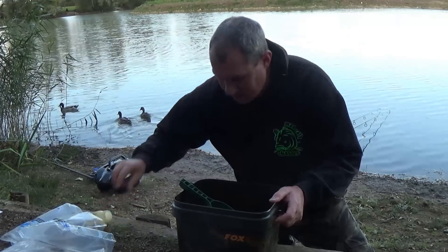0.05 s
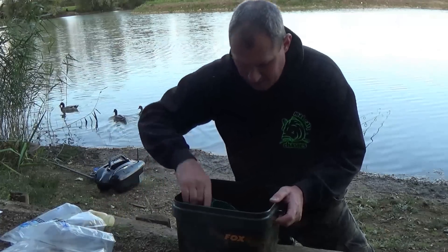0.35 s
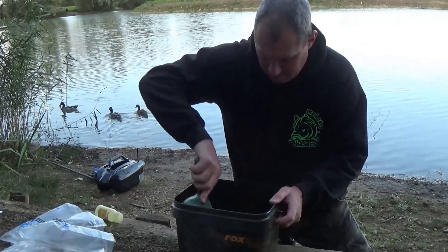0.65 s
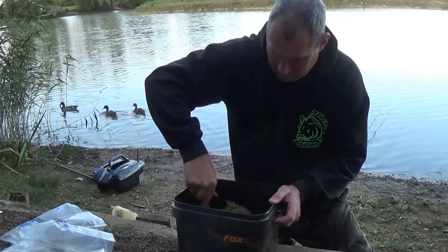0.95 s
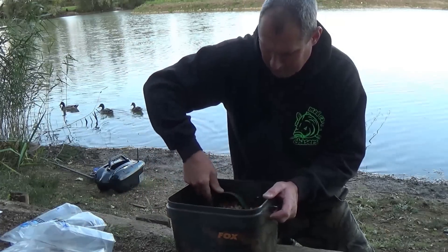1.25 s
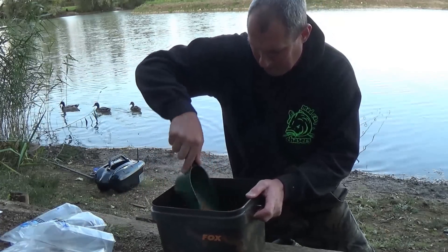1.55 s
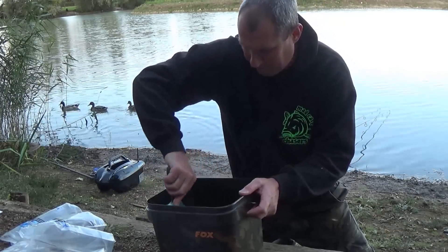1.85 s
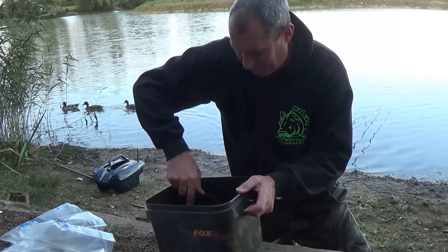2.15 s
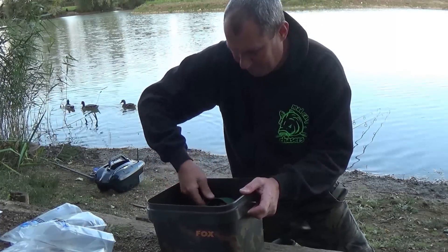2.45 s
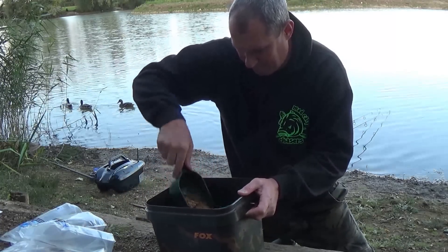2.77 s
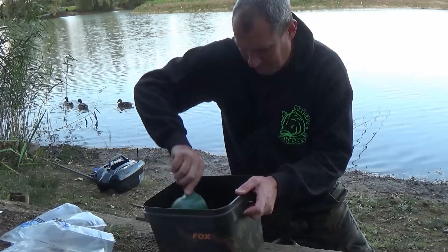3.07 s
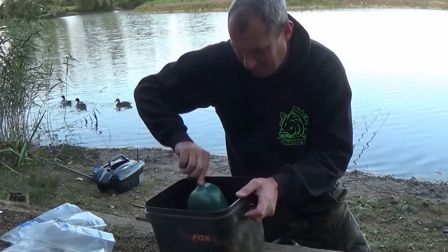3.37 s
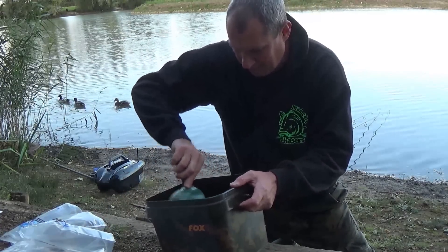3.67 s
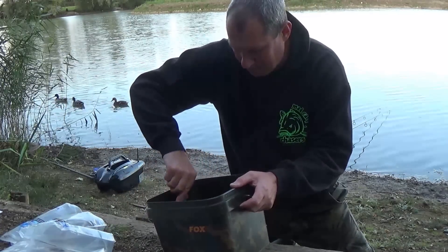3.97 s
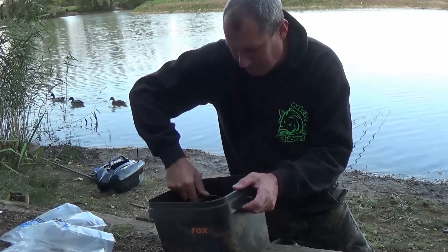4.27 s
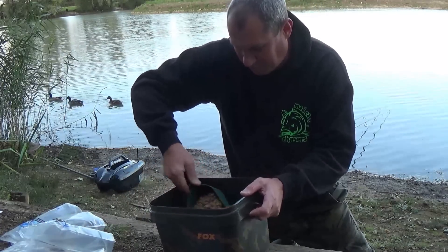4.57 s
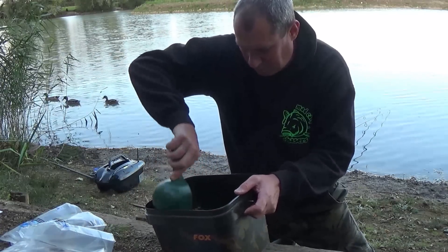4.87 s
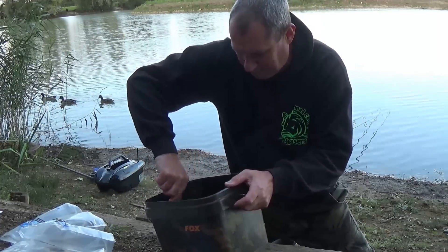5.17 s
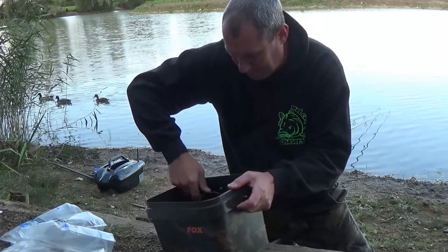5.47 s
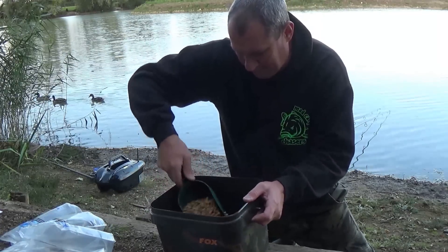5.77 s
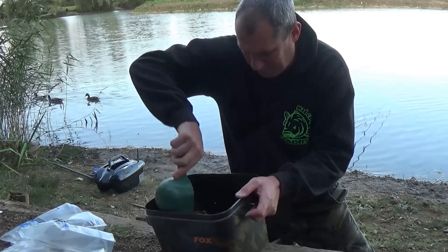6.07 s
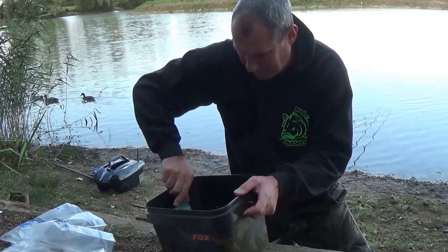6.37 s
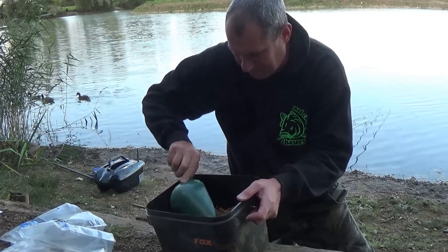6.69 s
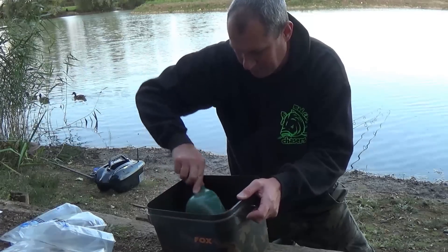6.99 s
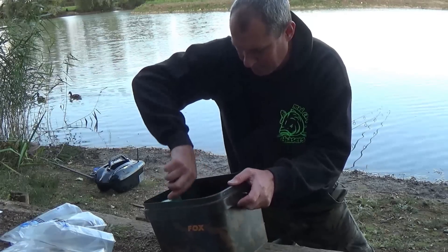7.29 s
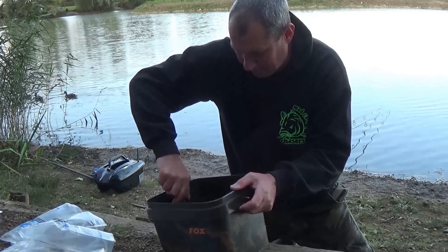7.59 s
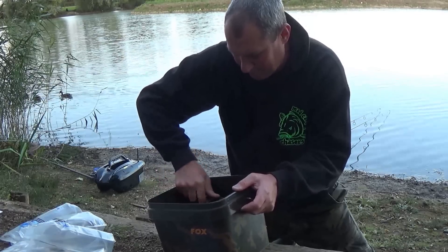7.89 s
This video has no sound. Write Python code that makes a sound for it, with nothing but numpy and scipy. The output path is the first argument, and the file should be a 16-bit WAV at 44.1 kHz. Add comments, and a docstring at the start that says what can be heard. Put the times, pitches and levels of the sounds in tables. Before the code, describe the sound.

At the very start a sleeve swishes softly and a small bottle is put down with a light knock. A few clicks follow, and at about 0.6 seconds a plastic scoop digs into damp pellets in a plastic bucket. It grinds through the heap and lifts, and the pellets rattle and spill back as many tiny, bright impacts. At about 1.3 seconds the bottle topples with a short hollow knock. The mixing carries on almost without a break, with fresh strokes near 1.7, 3, 3.7, 4.9, 6.1, 6.8 and 7.2 seconds, the last running to the end at about 8 seconds. Sharp clacks dot the rattling, and the scoop sometimes rubs the wall or bumps it with a dull thud, notably around 1.7, 3.7 and 7.2 seconds. The bucket is close and nearly straight ahead, over the faint, even hiss of a quiet lake shore.

```python
"""Scooping bait pellets in a bucket

A plastic scoop turns damp pellets in a plastic bucket on a quiet, faintly hissing lake shore.
It digs in, grinds through the heap and lifts; pellets rattle, clack and spill back as many tiny impacts.
Now and then it bumps the bucket, whose modes ring as a dull thud. At the start a sleeve swishes past
and a small bottle is put down; it topples a little later with a hollow knock."""
import sys
import numpy as np
from scipy import signal
from scipy.fft import rfft, irfft, next_fast_len
from scipy.io import wavfile

SR = 44100
rng = np.random.default_rng(int(sys.argv[2]) if len(sys.argv) > 2 else 0)


def file_out(sig):
    """Save sig as 16-bit WAV at sys.argv[1]."""
    # one column per channel
    cols = np.atleast_2d(sig).T
    # limit, then scale
    lim = np.clip(cols, -1, 1)
    pcm = np.round(lim * 32767).astype(np.int16)
    wavfile.write(sys.argv[1], SR, pcm)


N = 354652
TIME = np.arange(N) / SR

# Table levels are relative; each source applies its own gain.
# spectra: f/Hz, level/dB
SHORE_SPECTRUM = [(30, -39), (100, 0), (200, -10), (400, -4.5), (700, 6.5), (1000, 8), (1400, 1),
                  (3000, -2.5), (6000, -5.5), (10000, -43), (15000, -18)]
SLEEVE_SPECTRUM = [(500, -3), (1800, -4), (4000, -7), (6200, -2), (7500, -4), (9500, -4), (15000, -24)]
BOOM_SPECTRUM = [(30, -82), (95, -62), (140, -12.5), (220, -5), (330, 2), (450, -3.5), (600, -8.5),
                 (750, 0), (1100, -28)]
CLACK_SPECTRUM = [(200, -70), (700, -5.5), (1800, 2.5), (4000, 8.5), (6000, 9.5), (8500, 5), (11000, -1.5),
                  (15500, -20)]
GRIND_SPECTRUM = [(300, -28.5), (520, -11.5), (720, 0), (1100, 1.5), (1700, 0.5), (2400, 4.5), (3300, 1),
                  (6000, -35.5)]
RATTLE_SPECTRUM = [(500, -59), (1100, -0.5), (1800, -8.5), (2600, -1), (4000, 5.5), (5600, 3.5),
                   (7000, -1.5), (9000, -7), (15000, -37)]
SPILL_SPECTRUM = [(3000, -53), (5500, -1), (7000, -1), (8400, 0.5), (9700, -3), (11000, -8.5),
                  (12500, -14.5), (15500, -31)]
# stereo side weighting: f/Hz, level/dB
SIDE_SPECTRUM = [(60, -31), (150, -29), (400, -19), (800, -15.5), (1250, -20.5), (1800, -37), (3200, -16.5),
                 (6500, -23.5), (9000, -24.5), (13000, -7.5)]
# sleeve sweeping past: t/s, level/dB, reflection lag/ms
SLEEVE_SWEEP = [(0, -61, 0.49), (0.06, -44, 0.79), (0.15, -55, 0.76), (0.28, -57.5, 0.76), (0.37, -61, .92),
                (0.45, -94, 0.86)]
# bottle knocks: t/s, level/dB, f/Hz, t60/s
BOTTLE_KNOCKS = [(0.0643, -16, 530, 0.06), (0.074, -31, 474, .08), (0.083, -34, 496, 0.088),
                 (0.093, -38, 480, .07), (1.348, -14, 580, 0.24)]
# bottle modes: f/knock f, level/dB, t60/knock t60
BOTTLE_MODES = [(1, -6.5, 0.49), (1.17, -26, 0.65), (1.5, -6.5, 0.14), (2.2, -19, 0.44), (3.65, -21, 0.82),
                (6.1, -16, .15)]
# scoop hits bucket: t/s, level/dB, contact cutoff/Hz
BUCKET_BUMPS = [(0.558, -43, 900), (0.611, -39, 900), (0.664, -17.5, 450), (1.095, -22, 900),
                (1.14, -17.5, 256), (1.524, -27, 900), (1.706, -14.5, 350), (2.367, -17, 300),
                (3.009, -20.5, 463), (3.049, -19, 204), (3.748, -17, 600), (3.767, -23, 600),
                (4.328, -18, 400), (4.855, -24, 600), (5.49, -19.5, 300), (6.073, -21, 610),
                (6.094, -23, 610), (6.129, -21, 600), (6.806, -22.5, 2370), (6.819, -23, 900),
                (7.224, -14.5, 800), (7.267, -22.5, 900), (7.886, -17, 900)]
# modes of the loaded bucket: f/Hz, level/dB, t60/s
BUCKET_MODES = [(131, -19, 0.063), (177, -9, 0.048), (243, -2, 0.032), (304, 0, 0.045), (415, 3, 0.031),
                (522, -11.5, 0.071), (800, 4, 0.01), (1420, 19.5, 0.0017), (1800, 7, 0.016),
                (2690, -5, 0.013)]
# air and wall resonances excited by pellets: f/Hz, bandwidth/Hz, gain/dB
BUCKET_RESONANCES = [(407, 92, 11), (545, 30, 6.5), (720, 260, 6.5), (850, 130, 1.5), (1060, 240, 1.5),
                     (1446, 130, 2.5), (1810, 300, 3.5), (2690, 220, 2.5)]
# scoop-to-wall paths: lag/gap cycles, gain
WALL_PATHS = [(2.4, 0.13), (3.9, 0.23), (6.3, 0.19)]
# gap behind the scoop, lower when pushed in, higher on the lift: t/s, f/Hz
GAP_PITCH = [(0.65, 1636), (1.05, 1407), (1.25, 1245), (1.5, 1650), (1.74, 1770), (2.15, 1212), (2.31, 850),
             (2.45, 1283), (2.92, 1890), (3.08, 2000), (3.2, 1285), (3.5, 1590), (3.76, 2015), (3.88, 1475),
             (4.13, 1213), (4.26, 908), (4.42, 1193), (4.7, 1660), (4.88, 2040), (5.01, 1440), (5.17, 1476),
             (5.33, 964), (5.55, 1564), (5.8, 1740), (6.04, 1950), (6.3, 1430), (6.48, 1184), (6.7, 1730),
             (6.95, 1470), (7.13, 1910), (7.3, 1590), (7.52, 1516), (7.79, 823), (8.04, 1354)]
# scoop strokes: t in/s, t deepest/s, t out/s, depth/full scoop, loose rattle/dB
STROKES = [(0.65, 0.94, 1.69, 0.86, -28.2), (1.674, 2.16, 2.91, 0.89, -22.6),
           (3.026, 3.15, 3.53, 0.76, -34.7), (3.726, 4.17, 4.89, 1.0, -22.6),
           (4.904, 5.3, 5.99, 0.96, -22.0), (6.07, 6.49, 6.73, 0.86, -32.6),
           (6.796, 6.87, 7.12, 0.56, -30.5), (7.204, 7.75, 8.36, 1.0, -22.7)]
# heap gives way: t/s, length/s, rattle/dB, spill re rattle/dB, release/s, extra grind/dB
PELLET_RUSHES = [(0.392, 0.07, -37.5, -6, 0.024, -6), (0.487, 0.038, -41, -3, 0.017, 4),
                 (0.642, 0.09, -19.5, -3.5, 0.12, 1.5), (0.841, 0.2, -18.5, -2.5, 0.045, 2),
                 (1.08, 0.067, -25, 0, 0.05, 5.5), (1.45, 0.073, -18, -1.5, 0.055, 0),
                 (1.755, 0.12, -19, -3, 0.004, -1), (1.824, 0.075, -19, -10, 0.0091, 6),
                 (1.941, 0.16, -19, -3, 0.14, 2), (2.25, 0.17, -24.5, -3, 0.012, 2),
                 (2.375, 0.044, -19, -5, 0.009, -8), (2.502, 0.12, -28.5, -7.5, 0.015, -1),
                 (2.656, 0.15, -22, -7, 0.014, -1), (2.812, 0.086, -26.5, -14, 0.009, 1),
                 (2.88, 0.07, -34.5, 1, 0.15, 4), (2.983, 0.065, -22.5, -4, 0.048, -3),
                 (3.048, 0.16, -18.5, -3.5, 0.045, -1.5), (3.27, 0.17, -26, -6.5, 0.11, 2),
                 (3.392, 0.085, -18, -5.5, 0.02, 1), (3.474, 0.053, -25.5, -9, 0.0093, 7.5),
                 (3.606, 0.055, -23, -4.5, 0.036, 5.5), (3.706, 0.049, -21, -2, 0.0039, 3.5),
                 (3.769, 0.03, -18, -1, 0.012, 1), (3.794, 0.1, -18, -8.5, 0.043, 3.5),
                 (3.995, 0.078, -19.5, -11.5, 0.016, 1), (4.134, 0.41, -20.5, -6, 0.0034, -0.1),
                 (4.531, 0.17, -21, 1.5, 0.23, -3), (4.796, 0.023, -22.5, 0, 0.05, 9),
                 (4.917, 0.24, -20.5, -8.5, 0.022, -1.5), (5.235, 0.19, -21.5, -9, 0.09, 1.5),
                 (5.537, 0.1, -20, -2.5, 0.052, 2.5), (5.726, 0.082, -18.5, 0.5, 0.086, -4),
                 (5.933, 0.11, -27.5, 1.5, 0.026, -8), (6.037, 0.19, -28, 4.5, 0.024, 0.5),
                 (6.124, 0.12, -20, -7.5, 0.14, -5), (6.293, 0.2, -21.5, -10, 0.042, 1),
                 (6.492, 0.078, -20.5, -6.5, 0.095, 2), (6.783, 0.1, -20.5, -4, 0.02, -0.5),
                 (6.959, 0.1, -27.5, -2.5, 0.018, -3.5), (7.08, 0.035, -34.5, 0, 0.079, 1),
                 (7.283, 0.074, -21, -5, 0.0032, 2.5), (7.448, 0.084, -19.5, -22, 0.022, 3),
                 (7.62, 0.16, -21.5, -5.5, 0.016, 0.5), (7.847, 0.062, -25, 0, 0.02, 2),
                 (7.915, .09, -29, -3, 0.06, 2.5)]
# scoop catches, heap stalls: t/s, length/s, drop/dB
SCOOP_HALTS = [(1.055, .025, 4), (1.9, 0.033, 2), (2.429, 0.055, 2.5), (4.091, 0.042, 1), (4.497, 0.037, 6),
               (4.77, 0.032, 1.5), (5.699, 0.028, 0.5), (6.735, .03, 3.5), (7.25, 0.034, 6),
               (7.359, 0.033, 5)]
# scoop drags along the wall: t/s, length/s, level/dB
WALL_RUBS = [(0.72, 0.15, -36.5), (1.09, 0.035, -42), (1.502, 0.097, -42), (3.07, 0.11, -32),
             (3.623, 0.043, -34.5), (4.7, 0.098, -43), (5.505, 0.061, -32), (6.1, 0.14, -32),
             (6.786, 0.038, -25.5)]
# sharp clacks and ticks of pellets and of the scoop's handle: t/s, level/dB, t60/s, low cut/Hz
CLACKS = [(0.382, -42, .04, 500), (0.528, -36, .025, 900), (0.556, -25.5, 0.013, 700),
          (0.572, -23, 0.013, 1500), (0.59, -27.5, 0.04, 895), (0.609, -28, 0.031, 900),
          (0.626, -25, .022, 900), (0.641, -20.5, 0.02, 600), (0.65, -15.5, 0.1, 400),
          (1.052, -18, .018, 600), (1.0925, -7, 0.018, 7000), (1.4696, -15, .03, 2000),
          (1.529, -13, 0.025, 2500), (1.55, -22, 0.011, 4000), (1.574, -8, 0.02, 1200),
          (1.591, -28, 0.013, 1200), (1.685, -13.5, 0.014, 1200), (1.693, -20, 0.012, 2000),
          (1.7126, -18, .03, 1200), (1.744, -8, 0.01, 900), (1.762, -10, 0.029, 2000),
          (2.1701, -11, 0.015, 6500), (2.24, -5, .014, 5500), (2.2863, -7, 0.0083, 6000),
          (2.364, -8, 0.013, 2000), (2.6195, -13, .012, 1500), (2.6525, -15.5, .078, 900),
          (2.8376, -8, 0.014, 3500), (2.848, -11, .03, 3500), (3.007, -11.5, 0.045, 600),
          (3.627, -14, 0.026, 2000), (3.632, -12, 0.035, 600), (3.7208, -20, .035, 900),
          (3.741, -13.5, 0.071, 600), (4.092, -15, .014, 4500), (5.497, -4.5, 0.012, 4000),
          (6.0685, -12, 0.016, 1500), (6.093, -12, 0.011, 600), (6.774, -14, 0.024, 1200),
          (6.801, -12, 0.033, 400), (6.951, -14, 0.014, 3020), (7.0983, -18, .02, 2000),
          (7.121, -17.5, 0.033, 2000), (7.173, -18, 0.022, 900), (7.215, -16, 0.067, 1500),
          (7.243, -10.5, 0.017, 2000), (7.272, -11.5, 0.014, 3500), (7.2925, -10.5, 0.054, 895),
          (7.437, -18, 0.0073, 4000), (7.451, -13, 0.012, 2500), (7.574, -11, .008, 900),
          (7.88, -11, .018, 4500)]


def from_db(db):
    """Decibels to amplitude."""
    return 10 ** (np.asarray(db) / 20)


def unit_rms(x):
    """Scale to RMS 1."""
    return x / np.sqrt(np.mean(x ** 2) + 1e-20)


def in_time(rows):
    """Columns of a curve at every sample."""
    times, *columns = np.transpose(rows)
    return [np.interp(TIME, times, column) for column in columns]


def colour(x, spectrum, size=4096):
    """Minimum-phase filter with the given spectrum."""
    hz, db = np.transpose(spectrum)
    grid_hz = np.maximum(np.arange(size // 2 + 1) * SR / size, 1)
    gain = from_db(np.interp(np.log(grid_hz), np.log(hz), db))
    cepstrum = irfft(np.log(gain))
    cepstrum[1:size // 2] *= 2
    cepstrum[size // 2 + 1:] = 0
    return signal.oaconvolve(x, irfft(np.exp(rfft(cepstrum))))[:N]


def drift(rate_hz, hop=40):
    """Low-passed random wander, RMS 1."""
    r = np.exp(-2 * np.pi * rate_hz * hop / SR)
    slow = signal.lfilter([1], [1, -2 * r, r * r], rng.standard_normal(N // hop + 2002))[2000:]
    return np.interp(np.arange(N) / hop, np.arange(len(slow)), unit_rms(slow))


def ring(clicks, hz, t60_s):
    """One mode: a unit click starts a decaying sine of height 1."""
    r, w = np.exp(-np.log(1000) / (t60_s * SR)), 2 * np.pi * hz / SR
    return signal.lfilter([0, np.sin(w)], [1, -2 * r * np.cos(w), r * r], clicks + 1e-18)


def clicks_at(times_s, heights):
    """Single-sample blows."""
    out = np.zeros(N)
    np.add.at(out, (np.asarray(times_s) * SR).astype(int), heights)
    return out


def grains(per_s, spread_db, t60_s, bunch_db):
    """Random contacts of uneven force, bunched in small avalanches; each is a noise burst."""
    chance = np.clip(per_s * from_db(bunch_db * drift(45)) / SR, 1e-4, 1)
    sizes = from_db(spread_db * np.minimum(rng.exponential(1, N), 4))
    energy = sizes ** 2 * (rng.random(N) < chance) / per_s
    decay = np.exp(-2 * np.log(1000) / (t60_s * SR))
    return np.sqrt(signal.lfilter([1], [1, -decay], energy + 1e-18)) * rng.standard_normal(N)


def swell(start_s, end_s, release_s, attack_s=0.035):
    """Attack, hold and release, as power."""
    attack = np.clip((TIME - start_s) / attack_s, 0, 1)
    return (attack * np.exp(-np.maximum(TIME - end_s, 0) / release_s)) ** 2


def shore(mid_db=-51, side_db=-7):
    """Faint, even open-air hiss in stereo."""
    mid, side = (unit_rms(colour(noise, SHORE_SPECTRUM)) for noise in rng.standard_normal((2, N)))
    return from_db(mid_db) * (mid + from_db(side_db) * side * [[1], [-1]])


def sleeve(reflection=0.34):
    """Cloth hiss plus its reflection: a soft comb that sinks as the path grows."""
    level_db, lag_ms = in_time(SLEEVE_SWEEP)
    hiss = unit_rms(colour(rng.standard_normal(N), SLEEVE_SPECTRUM))
    echo = np.interp(TIME - lag_ms / 1000, TIME, hiss)
    return from_db(level_db) * unit_rms(hiss + reflection * echo) * (TIME < SLEEVE_SWEEP[-1][0])


def bottle(low_cut_hz=340):
    """Hollow knocks, shorter while the hand still holds the bottle."""
    knocks = sum(ring(clicks_at([t], from_db(db + mode_db)), hz * ratio, t60_s * share)
                 for t, db, hz, t60_s in BOTTLE_KNOCKS for ratio, mode_db, share in BOTTLE_MODES)
    return signal.sosfilt(signal.butter(4, low_cut_hz, "high", fs=SR, output="sos"), knocks)


def bumps(gain_db=-3, vary_db=2.0, max_lag_s=0.001, low_cut_hz=120):
    """The scoop strikes the bucket's modes unevenly; a cushioned blow favours the low ones."""
    times, level_db, cutoff_hz = np.transpose(BUCKET_BUMPS)
    shape = len(BUCKET_BUMPS), len(BUCKET_MODES)
    chance_db = vary_db * rng.standard_normal(shape)
    lag_s = max_lag_s * rng.random(shape)   # walls take up the blow in turn
    thuds = np.zeros(N)
    for k, (hz, mode_db, t60_s) in enumerate(BUCKET_MODES):
        heights = from_db(level_db + mode_db + gain_db + chance_db[:, k]) / np.hypot(1, hz / cutoff_hz)
        thuds += (-1) ** k * ring(clicks_at(times + lag_s[:, k], heights), hz, t60_s)
    return signal.sosfilt(signal.butter(4, low_cut_hz, "high", fs=SR, output="sos"), thuds)


def in_bucket(x, echo_db=-20, echo_t60_s=0.086, size=2048):
    """The bucket lifts its resonances and adds a short, faint flutter between its walls."""
    for hz, width_hz, lift_db in BUCKET_RESONANCES:
        b, a = signal.iirpeak(hz, hz / width_hz, fs=SR)
        x = x + (from_db(lift_db) - 1) * signal.lfilter(b, a, x)
    echoes = rng.standard_normal(size) * np.exp(-np.log(1000) * TIME[:size] / echo_t60_s)
    return x + from_db(echo_db) * signal.oaconvolve(x, echoes / np.linalg.norm(echoes))[:N]


def behind_scoop(x, gap_hz, q, block=128):
    """The gap behind the scoop acts as a moving resonant high-pass."""
    out, state = np.zeros(N), np.zeros(2)
    for i in range(0, N, block):
        w = 2 * np.pi * gap_hz[i] / SR
        r = np.exp(-w / (2 * q))
        b, a = r * np.array([1, -2, 1]), [1, -2 * r * np.cos(w), r * r]
        out[i:i + block], state = signal.lfilter(b, a, x[i:i + block], zi=state)
    return out


def between_walls(x, gap_hz, wander_oct=0.16, wander_hz=3):
    """Scoop-to-wall paths change length as the scoop turns: wandering hollow peaks."""
    out = x
    for cycles, gain in WALL_PATHS:
        lag_s = cycles / gap_hz * 2 ** (wander_oct * drift(wander_hz))
        out = out + gain * np.interp(TIME - lag_s, TIME, x)
    return out / np.sqrt(1 + sum(gain ** 2 for _, gain in WALL_PATHS))


def scoop_depth(entry=0.32, lift_curve=0.98):
    """Each stroke stabs in, pushes to its deepest point and lifts out; 1 is a full scoop."""
    depth = np.zeros(N)
    for start, deepest, end, full, _ in STROKES:
        push = np.interp(TIME, [start, deepest], [entry, 1], left=0)
        lift = np.interp(TIME, [deepest, end], [1, 0]) ** lift_curve
        depth += full * push * lift
    return depth


def pellet_flow(depth, depth_gain_db=6, surface_spill_db=0.25, buried_spill_db=-16.25, rest_s=0.022):
    """Loose rattle through each stroke, rushes on top: rattle/dB, spill re rattle/dB."""
    rattle = sum(from_db(db) ** 2 * swell(start, end, rest_s) for start, _, end, _, db in STROKES)
    rattle *= from_db(depth_gain_db * (depth - 1)) ** 2
    spill = rattle * from_db(surface_spill_db * (1 - depth) + buried_spill_db * depth) ** 2
    for start, length, db, spill_db, release_s, _ in PELLET_RUSHES:
        rush = from_db(db) ** 2 * swell(start, start + length, release_s)
        rattle += rush
        spill += rush * from_db(spill_db) ** 2
    return 10 * np.log10(rattle + 1e-12), 10 * np.log10((spill + 1e-13) / (rattle + 1e-12))


def scoop_load_db(depth, rattle_db, spill_db, surface_db=-33.5, deep_db=-21, relief_db=10):
    """Grinding grows with depth and rattle; falling pellets take the load off the scoop."""
    load_db = surface_db * (1 - depth) + deep_db * depth
    for start, length, _, _, release_s, extra_db in PELLET_RUSHES:
        load_db += extra_db * swell(start, start + length, release_s)
    falling = 1 / (1 + from_db(-spill_db) ** 2)
    load_db += 0.38 * (rattle_db + 20) - relief_db * falling
    return load_db - 6 * (TIME < STROKES[0][0])   # lighter before the first stroke


def stirring(waver_oct=0.1, waver_hz=6.35, halt_edge_s=0.006):
    """The scoop drives the heap: gap/Hz, rattle/dB, spill re rattle/dB, grind/dB."""
    depth = scoop_depth()
    # the heap shifts under a buried scoop
    gap_hz = in_time(GAP_PITCH)[0] * 2 ** (waver_oct * depth * drift(waver_hz))
    rattle_db, spill_db = pellet_flow(depth)
    grind_db = scoop_load_db(depth, rattle_db, spill_db)
    halt_db = sum(db * np.clip(np.minimum(TIME - t, t + length - TIME) / halt_edge_s + 0.5, 0, 1)
                  for t, length, db in SCOOP_HALTS)
    return gap_hz, rattle_db - halt_db, spill_db, grind_db - halt_db


def booming(rattle_db, grind_db, boom_db=-34, ref_db=-22, release_s=0.0087):
    """The heap shoves the walls and the bucket booms; more so when the scoop drags along them."""
    heap = from_db(boom_db + 0.38 * (grind_db - ref_db) + 0.5 * (rattle_db - ref_db)) ** 2
    rubs = sum(from_db(db) ** 2 * swell(t, t + length, release_s) for t, length, db in WALL_RUBS)
    shoves = in_bucket(grains(per_s=2000, spread_db=3.5, t60_s=0.0048, bunch_db=1.5))
    return np.sqrt(heap + rubs) * unit_rms(colour(shoves, BOOM_SPECTRUM))


def ticks(rattle_db, ref_per_s=220, ref_db=-20, gain_db=-3.5, range_hz=(3000, 9200), pitches=24):
    """Single pellets bounce off the plastic, each ringing for 30 cycles at a random pitch."""
    per_s = ref_per_s * from_db((rattle_db - ref_db) / 2)
    hits = np.flatnonzero(rng.random(N) < per_s / SR)
    chance_db = 3 * np.minimum(rng.exponential(1, N), 3)
    heights = from_db(rattle_db + gain_db + chance_db)[hits]
    pitch_index = rng.integers(0, pitches, N)[hits]
    rings = sum(ring(clicks_at(TIME[hits], heights * (pitch_index == k)), hz, t60_s=30 / hz)
                for k, hz in enumerate(np.geomspace(*range_hz, pitches)))
    return signal.lfilter(*signal.butter(2, range_hz[0] / 2, "high", fs=SR), rings)


def clacks(rattle_db, gain_db=-4, strays_per_s=16, stray_t60_s=0.009, stray_cut_hz=(1000, 7000)):
    """Sharp clacks and ticks of pellets and the scoop's handle, plus random strays: brief noise bursts."""
    contacts = rng.standard_normal(N) * from_db(1.5 * drift(250))
    landings = np.flatnonzero(rng.random(N) < strays_per_s / SR)
    stray_db = np.minimum(rattle_db + 12, -10)
    strays = [(TIME[i], stray_db[i], stray_t60_s, rng.uniform(*stray_cut_hz)) for i in landings]
    out = np.zeros(N)
    for t, db, t60_s, low_cut_hz in list(CLACKS) + strays:
        at = int(t * SR)
        age_s = TIME[:min(int(2 * t60_s * SR), N - at)]
        span = slice(at, at + len(age_s))
        burst = from_db(db) * np.exp(-np.log(1000) * age_s / t60_s) * contacts[span]
        out[span] += signal.lfilter(*signal.butter(2, low_cut_hz, "high", fs=SR), burst)
    return from_db(gain_db) * in_bucket(colour(out, CLACK_SPECTRUM))


def grinding(gap_hz, grind_db, ref_per_s=2500, ref_db=-23, gain_db=2.0, heap_db=-8):
    """Packed pellets slip along the scoop and against each other."""
    force_db = grind_db - ref_db
    per_s = ref_per_s * from_db(force_db / 2)
    on_scoop = behind_scoop(grains(per_s, spread_db=2.0, t60_s=0.0011, bunch_db=2.0), gap_hz, q=2.2)
    in_heap = grains(per_s, spread_db=4.5, t60_s=0.0056, bunch_db=3.5)
    slips = in_bucket(on_scoop + from_db(heap_db + 0.012 * force_db) * in_heap)
    return from_db(grind_db + gain_db) * unit_rms(colour(slips, GRIND_SPECTRUM))


def tumbling(gap_hz, rattle_db, spill_db, ref_per_s=7000, ref_db=-20, crowding=0.42):
    """Loose pellets: the more move, the louder and denser; falling ones sound brighter."""
    per_s = ref_per_s * from_db(crowding * (rattle_db - ref_db))
    contacts = in_bucket(grains(per_s, spread_db=3.5, t60_s=0.0073, bunch_db=2.0))
    contacts = behind_scoop(contacts, gap_hz, q=2.6)
    rattle = from_db(-1.5) * unit_rms(colour(contacts, RATTLE_SPECTRUM))
    fine = grains(per_s, spread_db=5.0, t60_s=0.0023, bunch_db=2.0)
    spill = from_db(spill_db - 1) * unit_rms(colour(fine, SPILL_SPECTRUM))
    return from_db(rattle_db) * (rattle + spill)


def pellets(gap_hz, rattle_db, spill_db, grind_db, jerk_db=0.93, jerk_hz=16):
    """Heap and scoop together; the heap gives way in small jerks."""
    jerks = from_db(jerk_db * drift(jerk_hz))
    scrape = between_walls(tumbling(gap_hz, rattle_db, spill_db) + grinding(gap_hz, grind_db), gap_hz)
    return jerks * (scrape + booming(rattle_db, grind_db)) + clacks(rattle_db) + ticks(rattle_db)


def scene(diffuse_db=-3, lead_db=-3):
    """Bucket nearly straight ahead; diffuse pellet sound and a slight left phase lead add width."""
    thuds = bumps()
    motion = stirring()
    mid = pellets(*motion) + thuds + bottle() + sleeve()
    size = next_fast_len(N, real=True)
    hz, side_db = np.transpose(SIDE_SPECTRUM)
    width = from_db(np.interp(np.log(1 + np.fft.rfftfreq(size, 1 / SR)), np.log(hz), side_db))
    diffuse = from_db(diffuse_db) * rfft(pellets(*motion), size)
    lead = 1j * from_db(lead_db) * rfft(mid, size)   # quarter cycle ahead of mid
    side = irfft(width * (diffuse + lead), size)[:N]
    return mid + side * [[1], [-1]] + shore()


def record(dry, ceiling=0.8, low_cut_hz=60, high_cut_hz=15900):
    """Round the peaks; cut deep bass and top."""
    bass_cut = signal.butter(1, low_cut_hz, "high", fs=SR, output="sos")
    top_cut = signal.ellip(10, 0.1, 80, high_cut_hz, fs=SR, output="sos")
    return signal.sosfilt(np.vstack([bass_cut, top_cut]), ceiling * np.tanh(dry / ceiling))


dry = scene()
out = record(dry)
file_out(out)
```